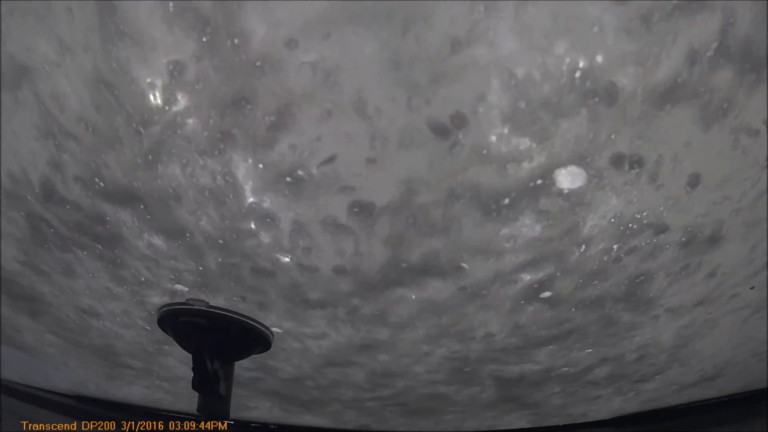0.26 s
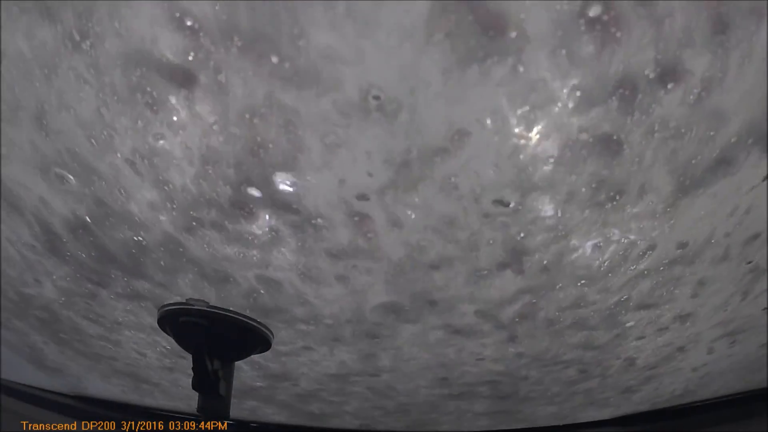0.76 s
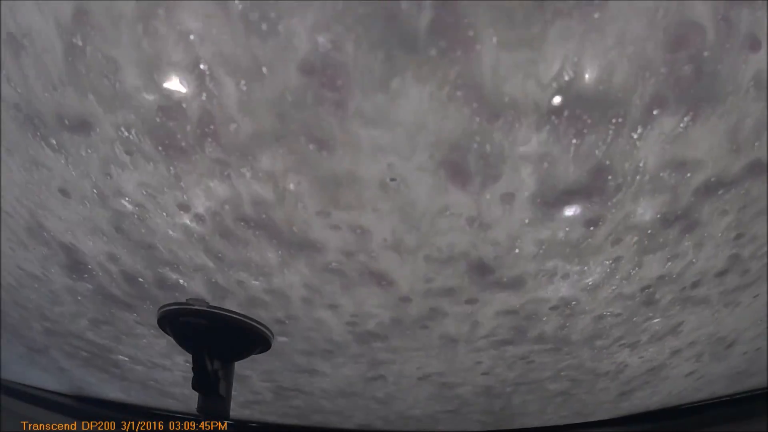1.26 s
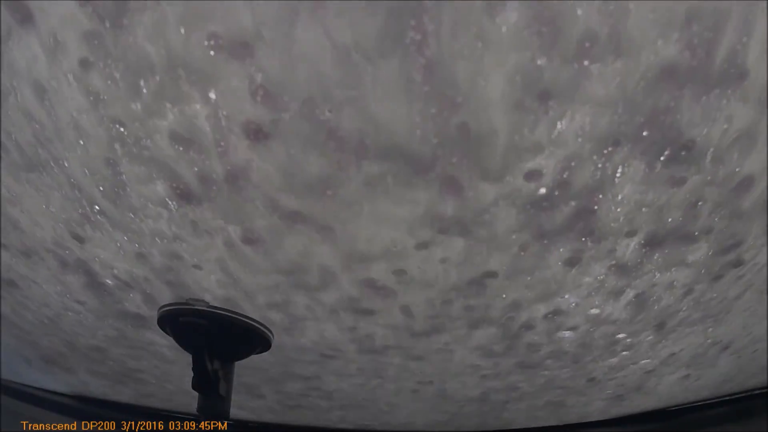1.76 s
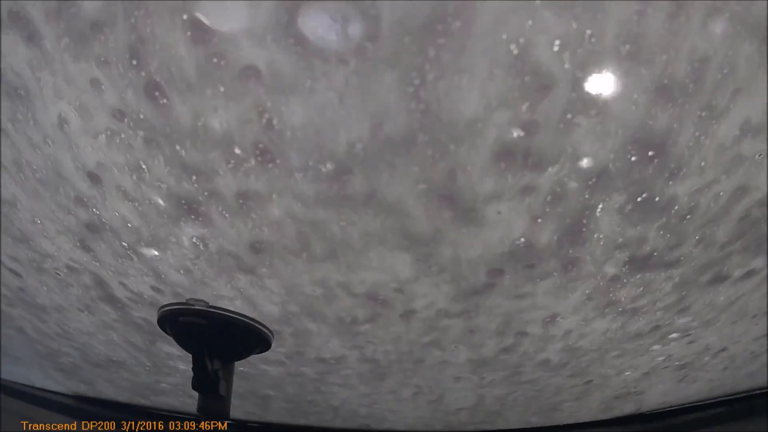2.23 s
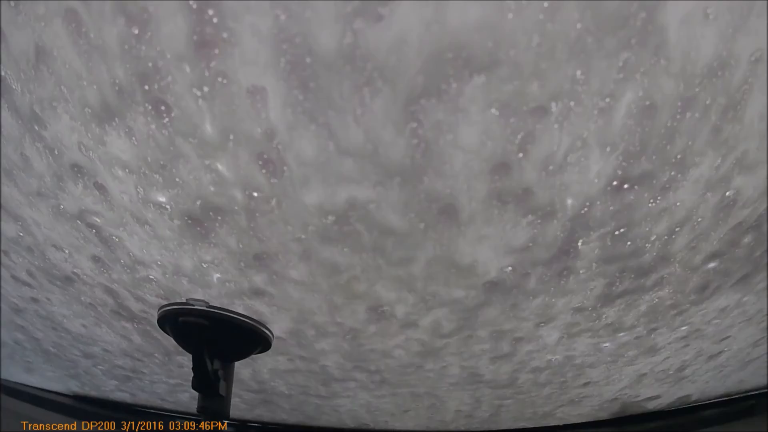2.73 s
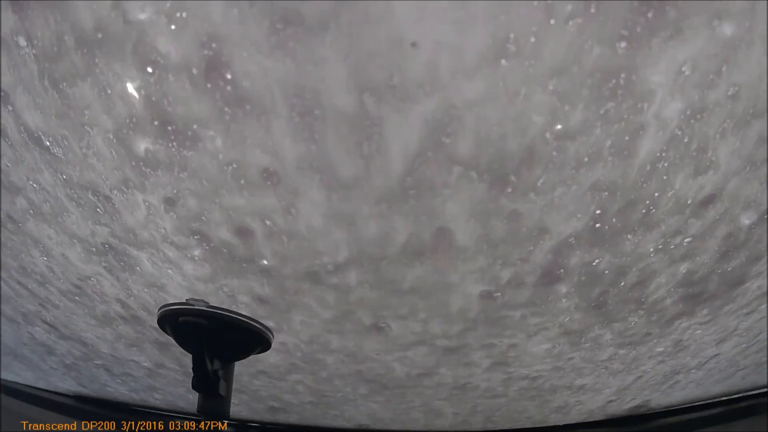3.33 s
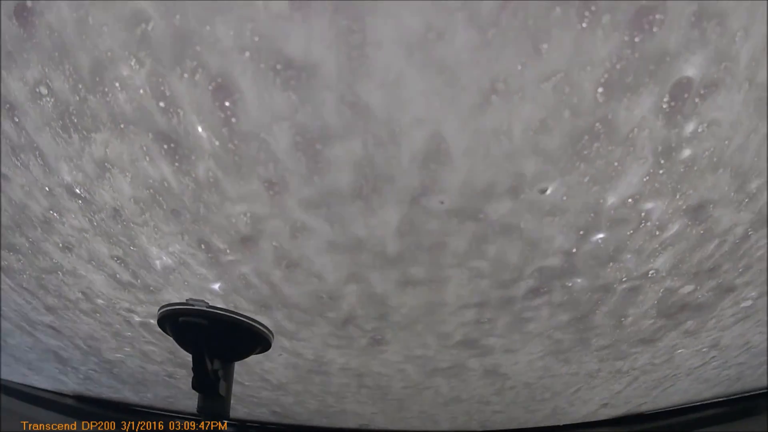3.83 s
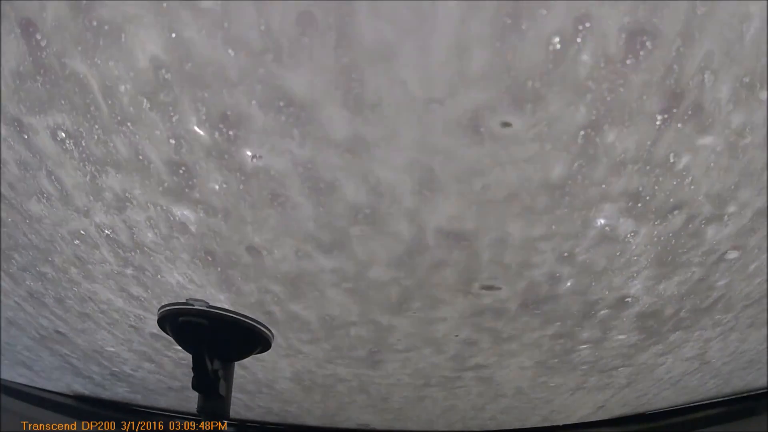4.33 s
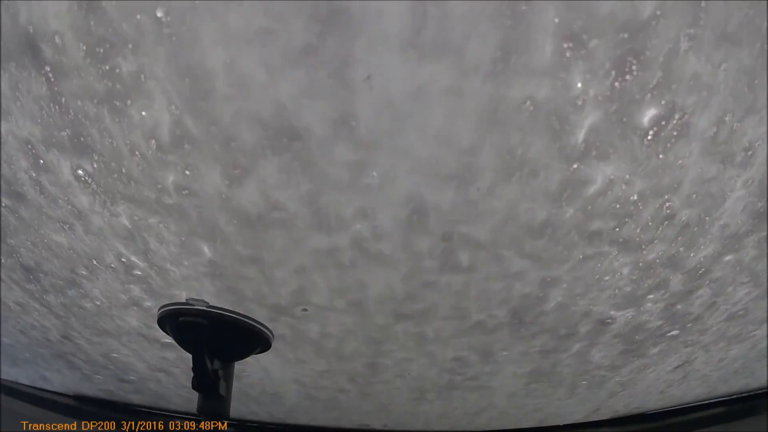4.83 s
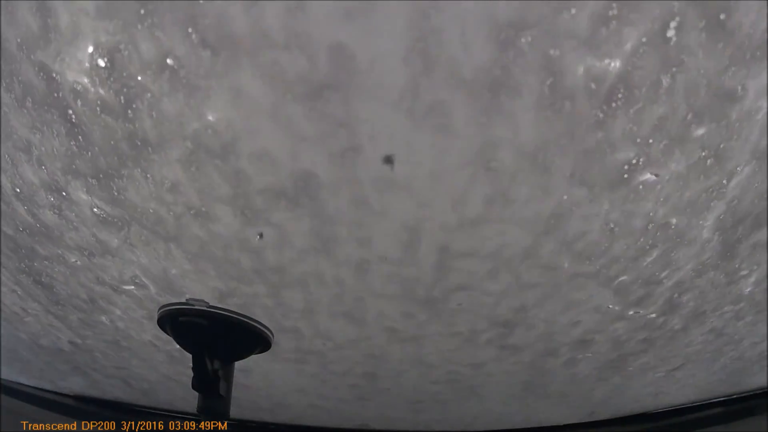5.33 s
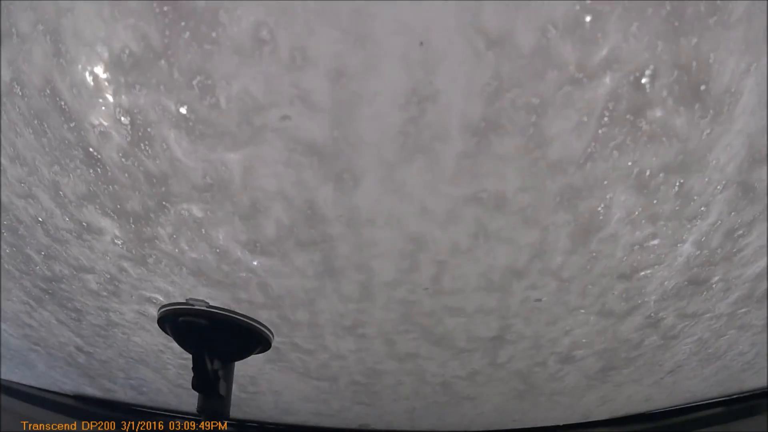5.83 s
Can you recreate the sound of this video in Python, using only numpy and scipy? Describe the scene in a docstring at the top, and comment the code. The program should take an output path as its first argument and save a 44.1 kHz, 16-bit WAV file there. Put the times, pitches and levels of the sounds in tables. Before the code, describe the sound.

Muffled pumps and brushes rumble around a closed car as a spinning nozzle throws water at the windscreen. Quiet, dull patter builds into dense irregular thuds and splashes with a hollow glassy knock, plus sharp treble ticks. The close, thin-sounding microphone on the glass distorts on the loudest hits. Near the end the blows are crisper and a little weaker, without stopping.

```python
"""Inside a car in a wash tunnel. Machinery rumbles and drones and fine spray hisses from the start, while a
spinning nozzle flings light drops and slugs of water on the windscreen, about eight turns a second.
Heavy slugs and sharp treble ticks join in after half a second; the blows swell as the car creeps under the jet.
In the later half the glass drums hard enough to overload a small microphone mounted on it, and it crackles.
Towards the end the blows ring brighter and ease a little. Bursts of random impacts ring the glass."""
import sys
import numpy as np
from scipy import signal
from scipy.fft import rfft, irfft, next_fast_len
from scipy.io import wavfile
from scipy.ndimage import map_coordinates

SR = 44100
rng = np.random.default_rng(int(sys.argv[2]) if len(sys.argv) > 2 else 0)


def persist_wave(psi):
    """Save psi, clipped to +-1, as 16-bit WAV."""
    counts = np.round(np.clip(psi, -1, 1) * 32767).astype(np.int16)
    wavfile.write(sys.argv[1], SR, np.atleast_2d(counts).T)


N = 268569

# pumps and brushes heard through the body: (frequency [Hz], level [dB])
RUMBLE_SPECTRUM = [(10, -21.5), (30, -1), (60, -1.5), (90, 1), (130, -3), (190, -0.5), (250, 0.5),
                   (350, -1.5), (500, -16), (1000, -56)]
# a body panel droning with the pumps: (frequency [Hz], level [dB])
DRONE_SPECTRUM = [(90, -46), (140, -8.5), (158, 3.5), (175, -15), (260, -54)]
# the course of the machinery: (time [s], rumble rms [dB], drone rms [dB])
MACHINERY_LEVELS = [(0, -37.5, -44), (1.2, -37.5, -40), (2.1, -39, -44.5), (4.4, -36.5, -45),
                    (5, -35, -44.5), (6.09, -34.5, -49.5)]
# the wash between slugs, before its small flutter: (time [s], drumming rms [dB], spray hiss rms [dB])
WASH_LEVELS = [(0, -35.5, -46.5), (1.3, -32.5, -52.5), (2, -30, -54), (3.1, -23.5, -55), (4.4, -21.5, -53),
               (5.1, -22, -51), (6.09, -27, -51)]
# fine spray heard through the glass: (frequency [Hz], level [dB])
HISS_SPECTRUM = [(300, -4.5), (1050, 3), (1700, 3), (2200, 4), (2800, 5.5), (3300, 5.5), (3700, -1),
                 (4150, -8), (4600, -2.5), (5400, -19), (6200, -8.5), (7200, -31.5), (9000, -44.5),
                 (11300, -38.5)]
# the windscreen and microphone mount under a soft blow: (frequency [Hz], level [dB])
GLASS_SPECTRUM = [(40, -52.5), (150, -30.5), (250, -25), (370, -12.5), (460, -10.5), (525, 0), (570, 5),
                  (625, 2), (690, -10.5), (780, -5), (840, -5.5), (920, -18.5), (1200, -26), (2200, -70.5)]
# small drops on the glass: (frequency [Hz], level [dB])
SPATTER_SPECTRUM = [(100, -37), (500, -16.5), (1000, -1.5), (1480, -0.5), (1680, 6), (1900, -1), (2400, 4),
                    (2850, 3), (3250, 2.5), (3700, -11.5), (5000, -28), (6300, -32), (8000, -53),
                    (12000, -73.5)]
# the jet as the car creeps under it, levels while it faces the glass, before scatter and the ticks' trim:
# (time [s], light slug drumming peak [dB], small drop level [dB], share of the full swing [0-1])
JET_COURSE = [(0, -28, -50.5, 0.1), (1.5, -21, -50.5, 0.21), (2.099, -15.5, -41.5, 0.7),
              (2.9, -12.5, -33.5, .7), (3.6, -7.5, -30, 0.6), (4.599, -7, -23.5, 0.8),
              (5.3, -8, -22.5, .95), (6.09, -12, -26, .95)]
# sharp treble ticks: single drops, and crackles where the loudest blows overload; levels before the ticks' trim:
# (time [s], level [dB])
SHARP_TICKS = [(0.517, -36), (1.705, -35), (2.2253, -29.5), (2.828, -28.5), (3.167, -22.5), (3.43, -14.5),
               (3.7985, -8), (4.0236, -11.5), (4.1739, -10), (4.4438, -16), (4.4983, -15.5), (4.661, -11.5),
               (4.7249, -17), (4.9231, -10.5), (5.1092, -21.5), (5.238, -18.5), (5.3038, -16),
               (5.6602, -16.5), (5.7826, -18.5)]
# the heaviest slugs: (time [s], length [s], drumming peak before overload [dB])
HEAVY_SLUGS = [(0.52, .026, -22), (0.747, 0.054, -18.5), (1.033, 0.023, -20.5), (1.838, .011, -20.5),
               (1.881, 0.0039, -15), (1.95, .03, -17), (2.331, 0.017, -15), (2.555, .03, -11.5),
               (2.683, .048, -10), (2.778, .025, -13), (2.895, .04, -10), (3.062, .04, -8.5),
               (3.17, .028, -3.5), (3.289, .011, -1.5), (3.315, 0.02, -7), (3.395, .011, -7),
               (3.411, .048, -.5), (3.514, 0.0049, -1), (3.55, 0.029, -1), (3.656, .011, .5),
               (3.733, .016, -2.5), (3.768, .016, -.5), (3.905, .045, -0.5), (4.021, .025, -1.5),
               (4.141, .055, -0.5), (4.232, .025, -4), (4.278, .036, 1), (4.364, 0.027, -5.5),
               (4.443, 0.012, -5.5), (4.507, 0.034, 0), (4.612, .031, 0.5), (4.656, .014, 2),
               (4.744, 0.033, -1), (4.853, .02, -2.5), (4.886, 0.014, 0.5), (4.914, 0.025, -0.5),
               (4.988, 0.01, -6.5), (5.035, .024, -1.5), (5.187, 0.014, -2.5), (5.255, .035, -3),
               (5.373, .052, 0), (5.48, .035, -3.5), (5.644, .038, -4.5), (5.783, 0.0067, -1.5),
               (5.88, .04, -1), (5.966, .03, -5), (6.019, .027, -2)]
# blows are round through thick foam and harder once the jet has cleared it: (time [s], tilt [dB per octave])
FOAM_TILT = [(0, -1.5), (2, -3), (3.4, -3), (4.4, 0), (5.3, 1.5), (6.09, 2)]
# the microphone, thin in the bass and bright on top: (frequency [Hz], level [dB])
MICROPHONE_RESPONSE = [(25, -26.5), (60, -22), (120, -12.5), (250, -5), (450, -0.5), (3000, -1),
                       (5000, 2.5), (6300, 0), (7200, -4), (9000, -1.5), (11400, 5.5), (11900, -2),
                       (12400, -13), (13000, -25.5)]
# dead spots of the microphone's cavity: (centre [Hz], width [Hz], depth [0-1])
CAVITY_NOTCHES = [(674, 35, 0.44), (952, 204, 1), (1298, 249, .95), (2600, 747, 0.98), (7820, 2600, .9),
                  (9980, 4900, .92)]

# the nozzle: turns a second, and one moment [s] at which it points straight at the windscreen
TURNS_PER_S, FACING_S = 8.15, 3.187
# full weakening while the nozzle points away, and random scatter either way
SLUG_SWING_DB, DROP_SWING_DB = 13.5, 23.5
SLUG_SCATTER_DB, DROP_SCATTER_DB = 3, 5.5
TICK_TRIM_DB = -9
LIGHT_LENGTH_S = .011  # middle length of a light slug
# spatter of a slug that drums at 0 dB, and dB of spatter gained per dB of drumming
SPLASH_DB, SPLASH_GROWS = -29, 1.325
OVERLOAD_TOP, TOP_HZ = 0.6, 13000  # clipping level (full scale is 1) and upper band limit


def amp(db):
    """Turn decibels into gain."""
    return 10 ** (np.asarray(db) / 20)


def unit(x):
    """Scale a sound to rms 1."""
    return x / np.sqrt(np.mean(x ** 2) + 1e-20)


def gain(points, hz):
    """Read a gain off a spectrum whose points are joined on a log frequency axis."""
    f, db = np.transpose(points)
    return amp(np.interp(np.log(hz + 1), np.log(f + 1), db))


def curves(rows):
    """Draw one value per sample for each column after the time."""
    s, *columns = np.transpose(rows)
    return [np.interp(np.arange(N) / SR, s, column) for column in columns]


def wobble(rate):
    """Draw a smooth random curve with rate knots a second."""
    knots = rng.standard_normal(int(N * rate / SR) + 4)
    return map_coordinates(knots, [np.arange(N) * rate / SR])


def filtered(x, response):
    """Filter a sound with a complex response of frequency."""
    m = next_fast_len(N + SR // 2)
    hz = np.fft.rfftfreq(m, 1 / SR)
    return irfft(rfft(x, m) * response(hz), m)[:N]


def ring(points, tilt_db=0, size=2048):
    """Make a struck body's minimum-phase ring from its spectrum, tilted by dB per octave; energy 1."""
    hz = np.fft.rfftfreq(size, 1 / SR)
    tilt = amp(tilt_db * np.log2(np.maximum(hz, hz[1])))
    cepstrum = irfft(np.log(gain(points, hz) * tilt))
    # folding the cepstrum forward puts the whole ring after the blow
    cepstrum[1:size // 2] *= 2
    cepstrum[size // 2 + 1:] = 0
    h = irfft(np.exp(rfft(cepstrum)))
    return h / np.linalg.norm(h)


def patter(rate, spread_db):
    """Scatter random impacts of either sign and varied size, about rate a second."""
    lands = rng.random(N) < rate / SR
    return lands * rng.choice([-1, 1], N) * amp(spread_db * rng.standard_normal(N))


def add(track, s, sound):
    """Mix a sound into the track from time s."""
    part = track[max(round(s * SR), 0):][:len(sound)]
    part += sound[:len(part)]


def burst(impacts, s, length, body, lead, fade_db):
    """Ring a body with a first blow and a fading run of impacts; its energy is that of rms 1 over the length."""
    n = max(round(length * SR), 64)
    force = np.take(impacts, round(s * SR) + np.arange(n), mode="wrap")
    force = force * amp(-fade_db * np.linspace(0, 1, n))
    force[0] += lead * np.linalg.norm(force) + 1e-6
    sound = signal.fftconvolve(force, body)
    return sound * np.sqrt(n / np.sum(sound ** 2))


def machinery():
    """Pumps and brushes rumble through the body and a panel drones: two bands of shaped noise."""
    rumble_db, drone_db = curves(MACHINERY_LEVELS)
    rumble = unit(filtered(rng.standard_normal(N), lambda hz: gain(RUMBLE_SPECTRUM, hz)))
    drone = unit(filtered(rng.standard_normal(N), lambda hz: gain(DRONE_SPECTRUM, hz)))
    return amp(rumble_db) * rumble + amp(drone_db) * drone


def wash():
    """Sheeting water drums unevenly on the glass as sparse impacts, and mist hisses over it as dense ones."""
    drum_db, hiss_db = curves(WASH_LEVELS)
    drum = unit(signal.fftconvolve(patter(rate=700, spread_db=4), ring(GLASS_SPECTRUM))[:N])
    hiss = unit(signal.fftconvolve(patter(rate=6000, spread_db=2.0), ring(HISS_SPECTRUM))[:N])
    drum_gain = amp(drum_db + 0.34 * wobble(25))
    hiss_gain = amp(hiss_db + 0.88 * wobble(12))
    return drum_gain * drum + hiss_gain * hiss


def flung(facing_db, swing_db, scatter_db, count):
    """Fling count pieces of water a turn, unevenly spaced and hardest as the nozzle faces the glass: times, dB."""
    place, size = rng.uniform(-1, 1, (2, 56 * count))  # 56 turns outlast the scene
    s = (np.arange(len(place)) + .5 + .5 * place) / (count * TURNS_PER_S)
    # 0 facing the glass, -1 or 1 pointing away
    away = 2 * (((s - FACING_S) * TURNS_PER_S + .5) % 1) - 1
    times, *_, share = np.transpose(JET_COURSE)
    swing = swing_db * np.interp(s, times, share) * away ** 2
    return s, np.interp(s, times, facing_db) - swing + scatter_db * size


def ticks():
    """Small drops of every turn and the sharp ticks: each a first blow and quickly fading fragments in the treble."""
    out, skin = np.zeros(N), ring(SPATTER_SPECTRUM)
    fragments = patter(rate=3500, spread_db=5.5)
    drop_db = np.transpose(JET_COURSE)[2]
    small_drops = zip(*flung(drop_db, DROP_SWING_DB, DROP_SCATTER_DB, count=6))
    for s, db in [*small_drops, *SHARP_TICKS]:
        tick = burst(fragments, s, 0.015, skin, lead=0.35, fade_db=25)
        add(out, s, amp(db + TICK_TRIM_DB) * tick)
    return out


def all_slugs():
    """Join the light slugs of every turn with the heavy ones: time [s], length [s], drumming peak [dB]."""
    slug_db = np.transpose(JET_COURSE)[1]
    s, db = flung(slug_db, SLUG_SWING_DB, SLUG_SCATTER_DB, count=4)
    length = LIGHT_LENGTH_S * np.exp(rng.uniform(-.6, .6, len(s)))
    return np.vstack([np.column_stack([s, length, db]), HEAVY_SLUGS])


def slugs():
    """Each slug's run of impacts drums the glass while its droplets spatter around it, more so when harder."""
    out, skin = np.zeros(N), ring(SPATTER_SPECTRUM)
    heavy = patter(rate=800, spread_db=3)
    fine, stray = patter(rate=1300, spread_db=7.5), patter(rate=510, spread_db=9.0)
    landings = all_slugs()
    for (s, length, drum_db), spot in zip(landings, rng.standard_normal(len(landings))):
        # every spot of the windscreen rings at a slightly different pitch
        spot_spectrum = np.array(GLASS_SPECTRUM) * [np.exp(.018 * spot), 1]
        glass = ring(spot_spectrum, tilt_db=np.interp(s, *np.transpose(FOAM_TILT)))
        thud = burst(heavy, s, length, glass, lead=0.53, fade_db=1.0)
        # the drumming follows the first spatter by about 1.5 ms
        add(out, s + 0.001494, amp(drum_db) * thud / np.abs(thud).max())
        spatter_db = SPLASH_DB + SPLASH_GROWS * drum_db
        spatter = burst(fine, s, length + 0.0035, skin, lead=0.15, fade_db=7.5)
        add(out, s, amp(spatter_db) * spatter)
        # a thin cloud of stray droplets arrives before the mass of water and trails after it
        cloud = burst(stray, s, length + 0.033, skin, lead=0, fade_db=9.0)
        add(out, s - .009, amp(spatter_db - 11.5) * cloud)
    return out


def scene():
    """Mix machinery, wash, ticks and slugs into one channel."""
    return (machinery() + wash() + ticks() + slugs())[None]


def overload(x, top):
    """Cut the loudest swings flat, which crackles."""
    return np.clip(x, -top, top)


def microphone(hz):
    """Colour the sound with an uneven response, cavity dead spots that cancel narrow bands, and a band limit."""
    response = gain(MICROPHONE_RESPONSE, hz) * (hz < TOP_HZ)
    for centre, width, depth in CAVITY_NOTCHES:
        damping = 1j * hz * width
        response = response * (1 - depth * damping / (centre ** 2 - hz ** 2 + damping))
    return response


def record(dry):
    """Let the hardest blows overload, then apply the microphone's response, which colours the crackle too."""
    return filtered(overload(dry[0], OVERLOAD_TOP), microphone)[None]


dry = scene()
out = record(dry)
persist_wave(out)
```